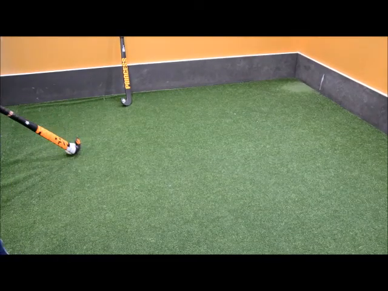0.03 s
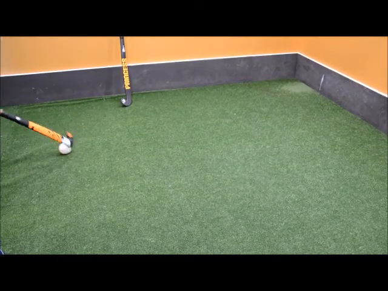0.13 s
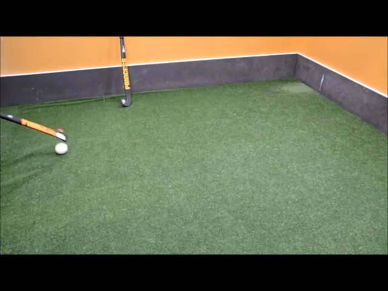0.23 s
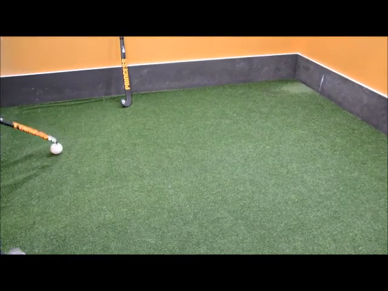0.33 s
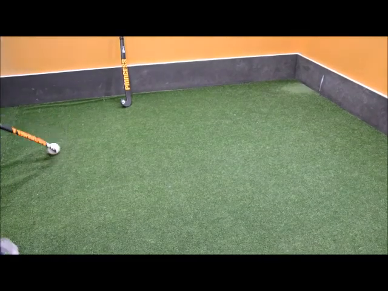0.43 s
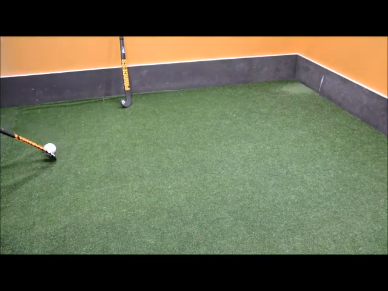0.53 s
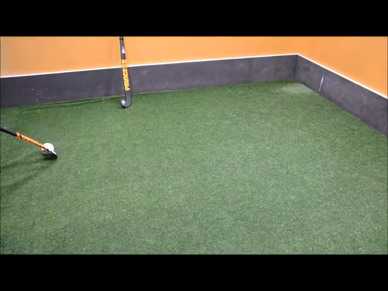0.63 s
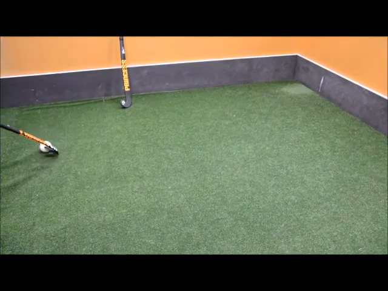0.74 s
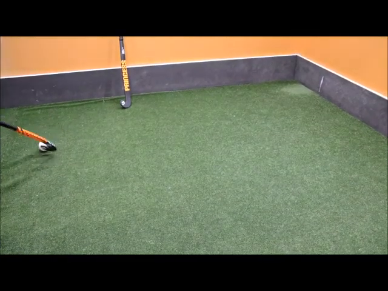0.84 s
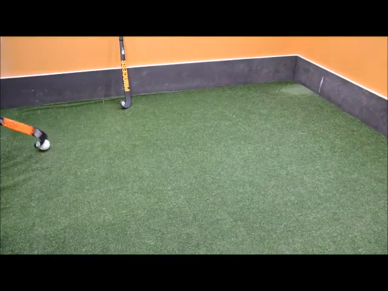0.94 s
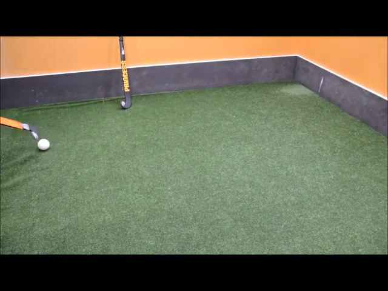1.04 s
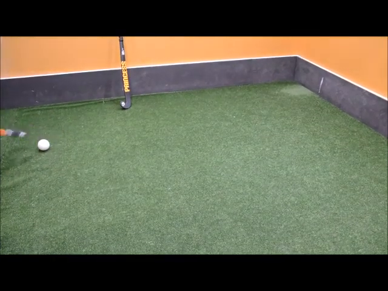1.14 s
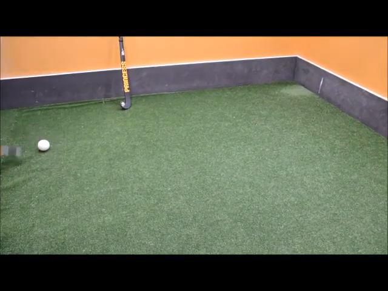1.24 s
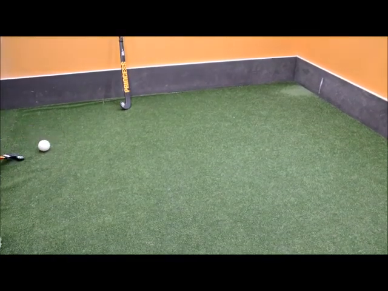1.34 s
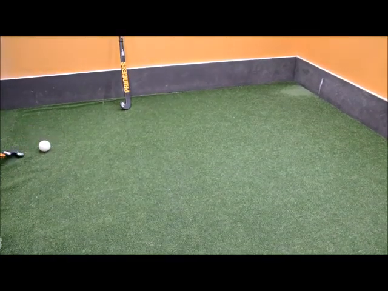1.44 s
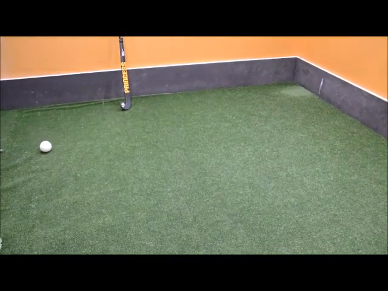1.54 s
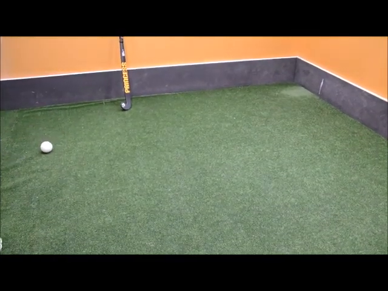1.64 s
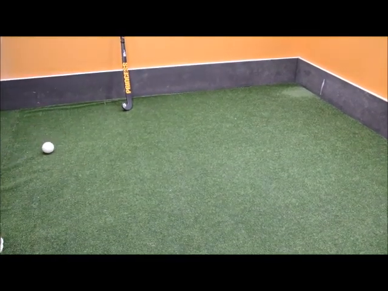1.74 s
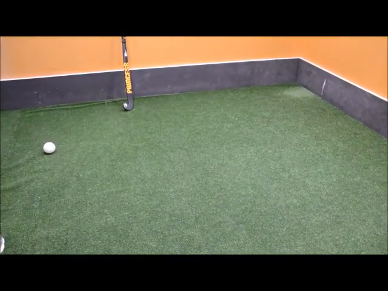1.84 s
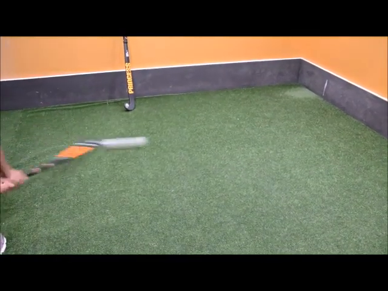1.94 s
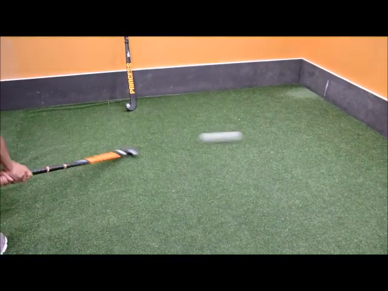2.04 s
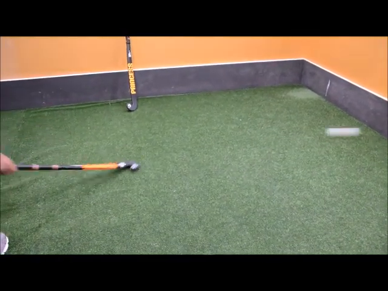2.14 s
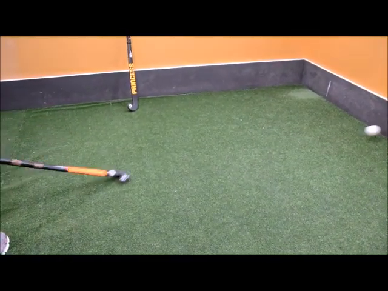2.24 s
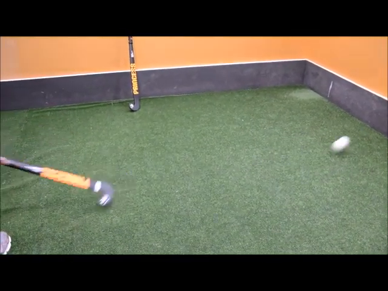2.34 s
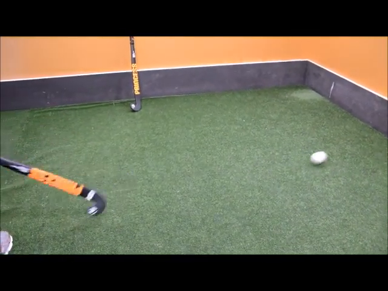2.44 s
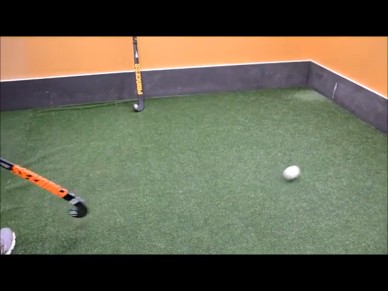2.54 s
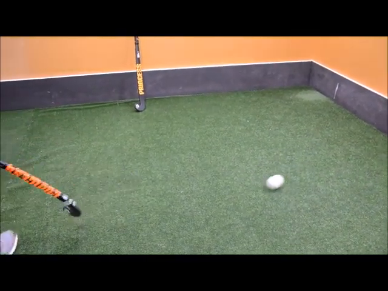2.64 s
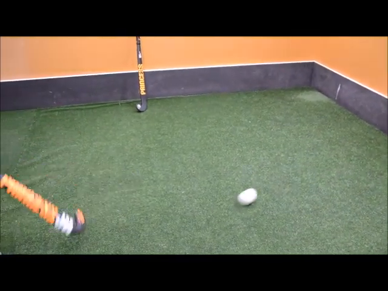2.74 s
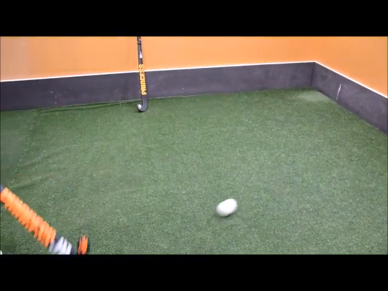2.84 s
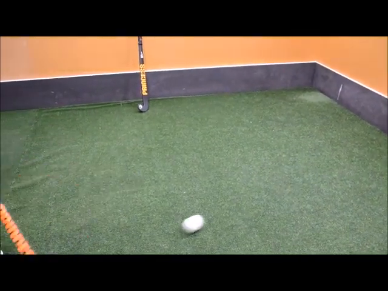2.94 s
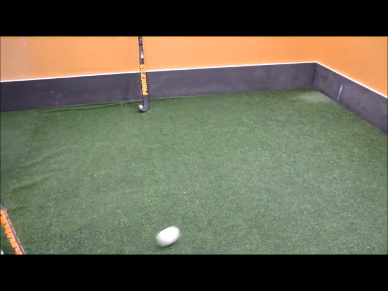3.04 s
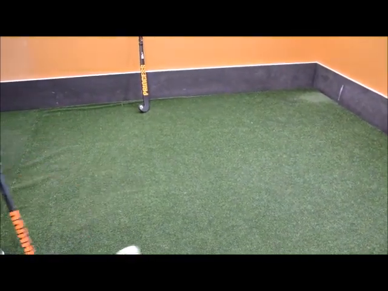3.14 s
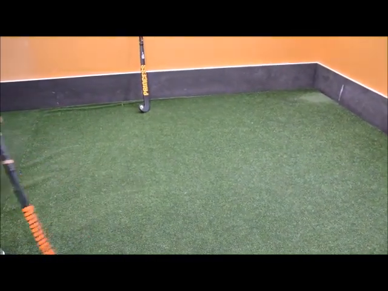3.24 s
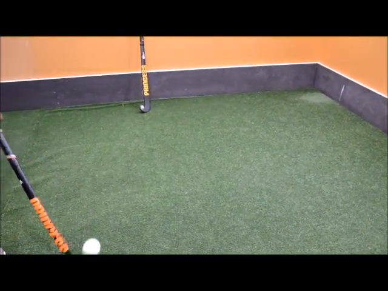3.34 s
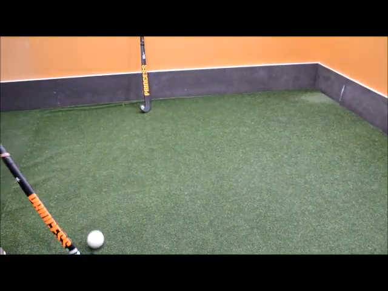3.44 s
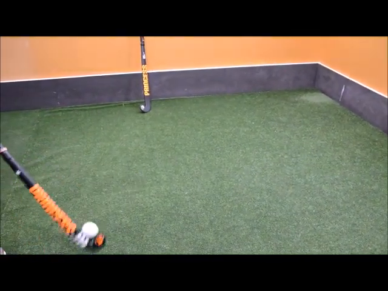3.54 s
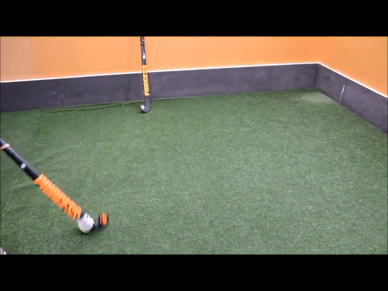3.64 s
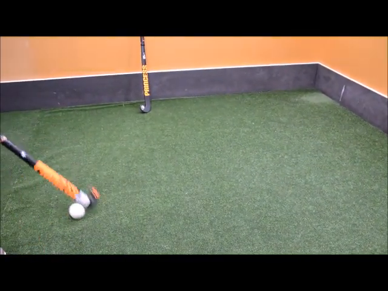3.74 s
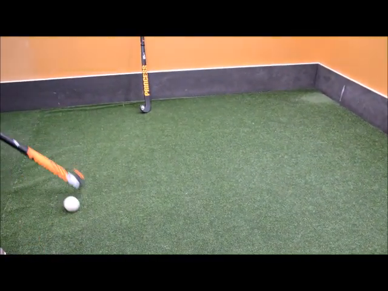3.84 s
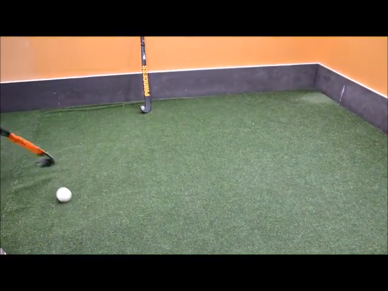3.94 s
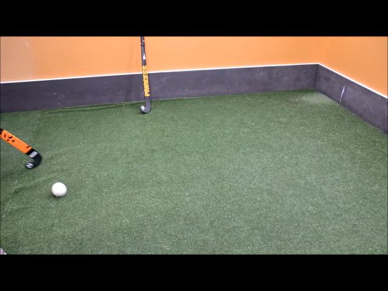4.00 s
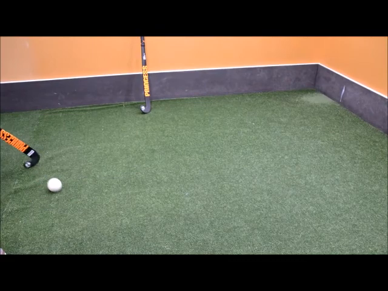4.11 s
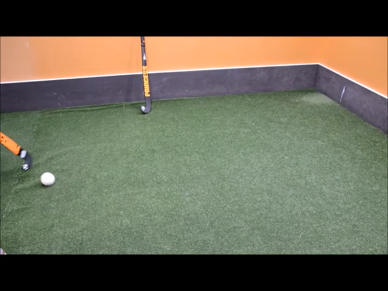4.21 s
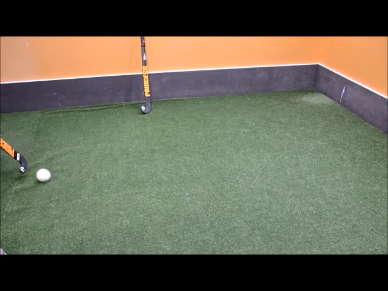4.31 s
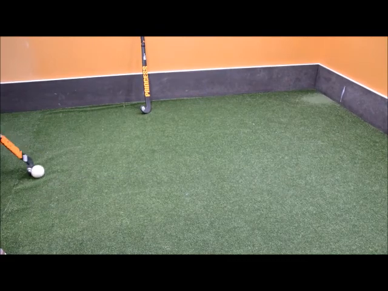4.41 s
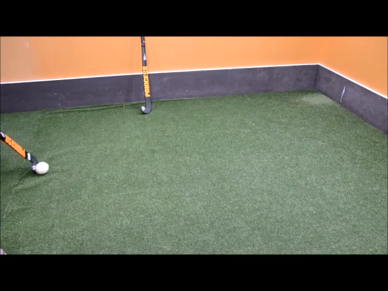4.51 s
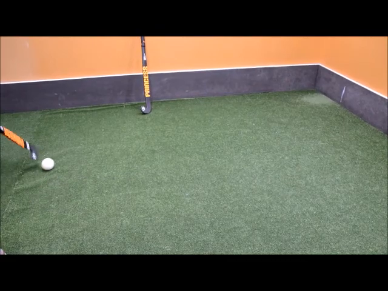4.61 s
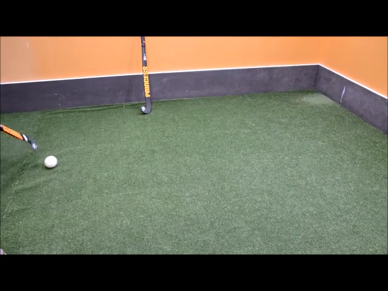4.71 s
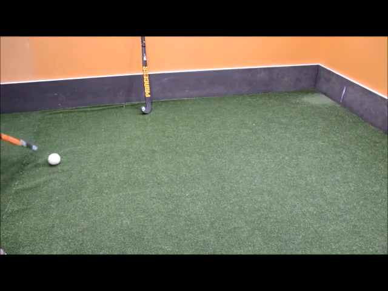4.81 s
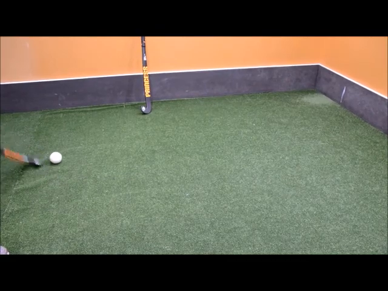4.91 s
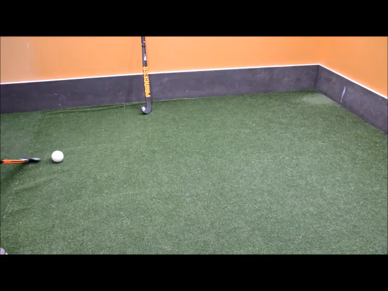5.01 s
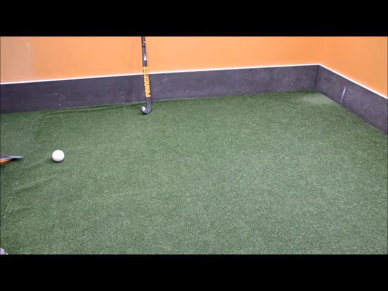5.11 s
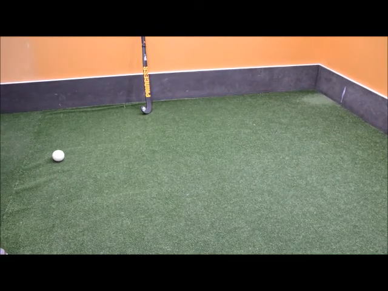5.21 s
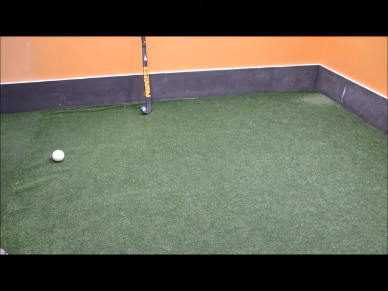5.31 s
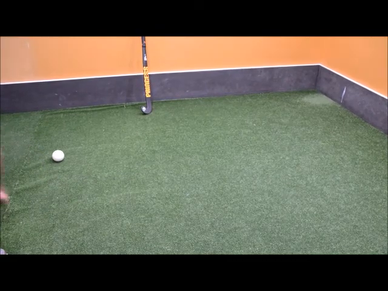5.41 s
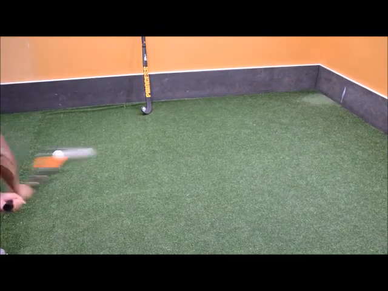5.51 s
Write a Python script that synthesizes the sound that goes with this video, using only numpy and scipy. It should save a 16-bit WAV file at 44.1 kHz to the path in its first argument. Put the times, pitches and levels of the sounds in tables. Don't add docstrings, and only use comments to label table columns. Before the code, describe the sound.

A small hard-walled room with quiet low air, heard in mono. From 0 s the stick barely nudges a hard ball, with a light tap near 0.6 and a low, soft dab at 1.2, amid dry hissing brushes over turf. At 1.9 a full shot cracks sharply, its tail filled by room reflections. At 2.2 the ball slams into the low side board: the loudest blow, boomy and clipped, with board tones ringing and a fuzzy low wall drone fading over the next second or so. Dull foot thumps follow at 2.5 and 2.7. At 3.25 the rebound is trapped with a hard woody knock and clear hollow shaft ring; a duller stop comes at 3.6. Small contacts follow: tap at 4.4, thin high clack at 4.7, dab at 4.9, then turf scuffing around 5.1. At 5.5 a last loud drive cracks and the sound ends on its brief tail.

```python
import sys
import numpy as np
from scipy import signal
from scipy.fft import irfft
from scipy.io import wavfile
from scipy.ndimage import uniform_filter1d

SR = 44100
rng = np.random.default_rng(int(sys.argv[2]) if len(sys.argv) > 2 else 0)


def boost_factor(decibels):
    exponent = np.asarray(decibels, float) / 20
    return 10 ** exponent


def int16_out(signal):
    q = np.round(np.clip(np.atleast_2d(signal).T, -1, 1) * 32767)
    wavfile.write(sys.argv[1], SR, q.astype(np.int16))


N = 245195


def evened(x):
    return x / np.sqrt(np.mean(x ** 2) + 1e-20)


def read(points, hz):
    f, value = np.transpose(points)
    return np.interp(np.log(hz + 1), np.log(f + 1), value)


def add(mix, start_s, sound):
    part = mix[round(start_s * SR):][:len(sound)]
    part += sound[:len(part)]


def blow(colour, spread_s, size=8192):
    hz = np.fft.fftfreq(size, 1 / SR)
    log_gain = np.log(boost_factor(np.maximum(read(colour, abs(hz)), -100)))
    minimum_phase = np.exp(np.conj(signal.hilbert(log_gain)))[:size // 2 + 1]
    stage_hz = np.cumsum(2 * rng.random(128)) / spread_s
    stage_hz = stage_hz[stage_hz < SR / 2, None]
    pole = np.exp(-np.pi * 0.45 / (spread_s * SR) + 2j * np.pi * stage_hz / SR)
    back = np.exp(-2j * np.pi * abs(hz[:len(minimum_phase)]) / SR)
    held = (back - pole.conj()) * (back - pole) / (1 - pole * back) / (1 - pole.conj() * back)
    return irfft(minimum_phase * held.prod(axis=0)) / abs(irfft(minimum_phase)).max()


def ring(modes, size=16384, rise_s=0.0003):
    t = np.arange(size) / SR
    sines = sum(boost_factor(db - 60 * t / t60_s) * np.sin(2 * np.pi * hz * t) for hz, db, t60_s in modes)
    radiation = signal.butter(3, 0.62 * modes[0][0], "high", fs=SR, output="sos")
    return signal.sosfilt(radiation, sines * (1 - np.exp(-t / rise_s)))


# pitch_hz, t60_s
ROOM_DECAY = [(60, 0.49), (150, 0.52), (400, 0.74), (1000, 0.8), (2500, 0.56), (6000, 0.62), (10000, 0.52),
              (16000, 0.57)]


def room(gap_s=0.0036, build_s=0.003, early_db=4, early_s=0.075):
    taps = np.zeros(SR)
    at = np.arange(0, SR - 12, 12) + rng.integers(0, 12, SR // 12 - 1)
    clumps_db = 0.5 * evened(uniform_filter1d(rng.standard_normal(at.shape), size=30))
    sizes_db = 3 * rng.standard_normal(at.shape) + clumps_db
    taps[at] = rng.choice([-1., 1.], at.shape) * boost_factor(sizes_db)
    hz, t, z = signal.stft(taps, SR, nperseg=512)
    fall_db = -60 * t / read(ROOM_DECAY, hz)[:, None] + early_db * np.exp(-(t / early_s) ** 2)
    tail = signal.istft(z * boost_factor(fall_db), SR, nperseg=512)[1][:SR]
    after_gap_s = np.maximum(np.arange(SR) / SR - gap_s, 0)
    tail = tail * (1 - np.exp(-after_gap_s / build_s))
    return tail / np.linalg.norm(tail)


def knocks(rows, colour, modes, ring_db, echo_ms, echo_db, spread_s,
           tick_hz=7000, lag_s=0., top_db=-4, dull_db=-3):
    out = np.zeros(N)
    tick_modes = [(tick_hz, 0, 0.0024), (1.45 * tick_hz, -5, 0.0015), (1.96 * tick_hz, top_db, 0.0015)]
    tick = np.roll(ring(tick_modes, rise_s=0.00003), round(lag_s * SR))
    for start_s, level_db, tick_db, room_db in rows:
        body = boost_factor(ring_db) * ring(modes)
        add(body, 0, blow(colour, spread_s))
        knock = boost_factor(level_db) * body
        crack = boost_factor(tick_db) * tick
        echo = knock + boost_factor(dull_db) * crack
        add(out, start_s, knock + crack)
        add(out, start_s + echo_ms / 1000, boost_factor(echo_db) * echo)
        add(out, start_s + 2 * echo_ms / 1000, -boost_factor(echo_db - 12) * echo)
        add(out, start_s, boost_factor(level_db + room_db) * signal.fftconvolve(body, room()))
    return out


# start_s, level_db, tick_db, room_db
SHOTS = [
    (1.8735, -0.5, -16, 4.5),
]
DRIVES = [
    (5.4853, 0.0079, -15, 5),
]
# pitch_hz, density_db_per_hz
SHOT_COLOUR = [(35, -70.5), (60, -35.5), (157, -29), (334, -15.5), (366, -16.5), (559, -2.5), (1060, -4),
               (1940, -12.5), (3750, -12), (5600, -28), (12400, -36), (15400, -38.5), (16500, -73)]
DRIVE_COLOUR = [(35, -74), (60, -35), (130, -28.5), (199, -26.5), (546, -10.5), (759, 0), (1370, -7),
                (1540, -6.5), (1940, -13.5), (3930, -9), (4220, -15), (15000, -41.5), (16500, -69)]
# pitch_hz, level_db, t60_s
FACE_MODES = [(591.3, -13.5, 0.013), (1012, -7, 0.021), (1550, 2, 0.014)]


def shot_and_drive():
    shot = knocks(SHOTS, SHOT_COLOUR, FACE_MODES, -20.5, echo_ms=4.5, echo_db=-17,
                  spread_s=0.0019, tick_hz=7300, lag_s=0.00095)
    drive = knocks(DRIVES, DRIVE_COLOUR, FACE_MODES, -14, echo_ms=4.7, echo_db=-10, dull_db=-4,
                   spread_s=0.0014, tick_hz=7380, lag_s=0.0009)
    return shot + drive


# start_s, level_db, tick_db, room_db
BOARD_HIT = [
    (2.1732, 8.74, 0, 7.96),
]
# pitch_hz, density_db_per_hz
BOARD_COLOUR = [(18, -65), (40, -43), (62, -38.5), (95, -9.5), (160, -8.5), (255, -5.5), (350, -2),
                (470, -8.5), (670, -8.5), (1000, -13), (2160, -22), (3500, -26.5), (8000, -42),
                (16500, -61)]
# pitch_hz, level_db, t60_s
PANEL_MODES = [(93, -7, .1), (204, -11.5, 0.079), (350, -8.5, .07), (683.6, 0, 0.089), (846, -20, .06)]


def board():
    return knocks(BOARD_HIT, BOARD_COLOUR, PANEL_MODES, -21.5, echo_ms=5.8, echo_db=0,
                  spread_s=0.0012, tick_hz=6464, top_db=-14, dull_db=-11)


# pitch_hz, level_db, t60_s
PLANK_MODES = [(99, -9.5, 0.36), (224, -12, .4), (278.9, -9.5, .4), (340, -4.5, .4), (375.3, -6.5, 0.369),
               (516, -15.5, 0.86), (611, -16, 0.54), (683, -9.5, .6), (740, -13.5, .7), (856, -16, .6)]


def plank():
    out = np.zeros(N)
    add(out, BOARD_HIT[0][0], ring(PLANK_MODES, size=32768, rise_s=0.016))
    return out


# start_s, level_db, tick_db, room_db
TRAPS = [
    (3.2470, -3.5, -25, 6.06),
]
STOPS = [
    (3.6225, -12, -24, 4.3),
]
# pitch_hz, density_db_per_hz
TRAP_COLOUR = [(35, -68), (60, -40), (366, -16), (520, -9), (629, -11.5), (759, -4), (1010, -11),
               (1130, -2.5), (1400, -8.5), (1730, -7), (1940, -16.5), (2770, -14.5), (5500, -31.5),
               (8150, -35), (15000, -46), (16500, -74)]
STOP_COLOUR = [(35, -56), (60, -24), (103, -18.5), (229, -12.5), (290, -5), (724, -5), (938, -5.5),
               (1270, -7.5), (1990, -15.5), (5220, -18.5), (11300, -42), (15400, -45), (16500, -77)]
# pitch_hz, level_db, t60_s
STICK_MODES = [(580, -17, 0.16), (755, -4, 0.034), (1088, -6, 0.066), (1271, -4, 0.059), (1680, -9, 0.023),
               (2830, -4, 0.027), (3330, -10, 0.031)]


def trap_and_stop():
    trap = knocks(TRAPS, TRAP_COLOUR, STICK_MODES, -13.5, echo_ms=10.05, echo_db=-2.5,
                  spread_s=0.001248, tick_hz=6440, top_db=11.5, dull_db=-23)
    stop = knocks(STOPS, STOP_COLOUR, STICK_MODES, -16.5, echo_ms=9.1, echo_db=-5.5,
                  spread_s=0.000723, tick_hz=6300, top_db=-22, dull_db=0)
    return trap + stop


# start_s, level_db, tick_db, room_db
DABS = [
    (1.2395, -14, -23, 6.6),
    (4.8965, -18.5, -28, 3.9),
]
# pitch_hz, density_db_per_hz
DAB_COLOUR = [(24, -46), (40, -26), (70, 3.5), (107, -8), (265, -3.5), (593, -11), (1090, 0.5),
              (1540, -11.5), (3730, -12.5), (11300, -40.5), (14900, -59), (16500, -74.5)]
# pitch_hz, level_db, t60_s
SOLE_MODES = [(205, 0.5, 0.046), (900, -11, 0.022), (1015, -7, .09), (1360, -16, 0.054)]


def dabs():
    return knocks(DABS, DAB_COLOUR, SOLE_MODES, -26, echo_ms=7.5, echo_db=-11.5,
                  spread_s=0.0034, tick_hz=3840, lag_s=0.0029)


# start_s, level_db, tick_db, room_db
CLACKS = [
    (4.7000, -19.5, -43, 8.3),
]
# pitch_hz, density_db_per_hz
CLACK_COLOUR = [(59, -58), (100, -23), (368, -21.5), (684, -30), (903, -8.5), (1070, -13), (1170, -6.5),
                (1830, -20.5), (1950, -19), (2310, -18), (3780, -12), (12000, -56), (16500, -69)]
# pitch_hz, level_db, t60_s
TOE_MODES = [(1210, 2, 0.051), (2030, -8, 0.14), (2170, -5.5, .06), (3430, -5.5, .08), (3760, -16, 0.058),
             (3900, -13, 0.07), (4280, -15, .045), (5240, -19, 0.05)]


def clack():
    return knocks(CLACKS, CLACK_COLOUR, TOE_MODES, -20, echo_ms=2.3, echo_db=-5,
                  spread_s=0.00151, tick_hz=3960)


# start_s, level_db, tick_db, room_db
TAPS = [
    (.5922, -28, -46, 6.5),
    (4.4060, -23.5, -40, 8.8),
]
NUDGES = [(0, -41, -70, 9.5), (.2130, -52, -58, 4.1), (.5125, -43, -40, 6.9), (2.6850, -46, -34, 2.2),
          (3.3680, -45, -49, 2.6), (3.4200, -48, -42, 2.6), (3.4350, -37, -43, 1.2),
          (3.6550, -42, -47, 1.2), (3.8450, -47, -52, 1.2), (5.0880, -59, -42, 6.9),
          (5.4530, -42, -48.5, 3.8)]
# pitch_hz, density_db_per_hz
TAP_COLOUR = [(59, -51), (100, -30), (190, -22), (230, -23), (310, -11), (466, -15.5), (1220, -3),
              (2360, -17.5), (4390, -18.5), (11000, -43), (16500, -41)]
NUDGE_COLOUR = [(59, -52), (100, -38), (216, 0), (262, -65), (401, 4.5), (963, 1), (1190, 1.5), (3700, -23),
                (15100, -26), (16500, -45)]
# pitch_hz, level_db, t60_s
HEAD_MODES = [(716, -13.5, 0.066), (1211, -7.5, 0.025)]


def taps_and_nudges():
    taps = knocks(TAPS, TAP_COLOUR, HEAD_MODES, -4.5, echo_ms=11, echo_db=-11, spread_s=0.001254)
    nudges = knocks(NUDGES, NUDGE_COLOUR, HEAD_MODES, -24.5, echo_ms=27, echo_db=3,
                    spread_s=0.00068, tick_hz=3980)
    return taps + nudges


# pitch_hz, level_db, t60_s
SHAFT_MODES = [(748, -3.5, 0.95), (1150, -24, 0.38), (1220, -11.5, 0.55), (1244, 1, 0.25), (1370, -5, 0.26),
               (1698, 4, 0.48)]
# start_s, level_db, loss_db per third octave away from 1200 Hz
SINGS = [
    (0.592, -54, -1),
    (1.242, -47, 0),
    (3.247, -19.5, 4.5),
    (3.6227, -28.5, 8.5),
    (4.408, -39, -15),
    (4.701, -50, -2),
]


def shaft():
    out = np.zeros(N)
    for start_s, level_db, loss_db in SINGS:
        modes = []
        for hz, mode_db, t60_s in SHAFT_MODES:
            away_db = abs(loss_db * np.log2(hz / 1200)) * 3
            modes.append((hz, mode_db + level_db - away_db, t60_s))
        add(out, start_s, ring(modes, size=32768, rise_s=0.0013))
    return out


# start_s, peak_db, pitch_hz, t60_s
THUMPS = [(0.66, -75, 206, 0.27), (1.236, -36, 185, 0.13), (1.246, -55, 265, 0.13), (1.25, -46, 139, 0.2),
          (2.5, -37, 85.5, 0.23), (2.719, -47, 76, 0.29), (3.418, -35, 99, 0.084), (3.557, -47, 80.7, 0.13),
          (3.613, -43.5, 192, 0.28), (4.097, -52, 114.8, 0.23), (4.658, -50, 96.9, 0.25),
          (4.662, -48, 227, 0.12), (4.891, -43, 191.4, 0.19), (5.38, -56, 92.5, 0.42)]


def thumps():
    out, t = np.zeros(N), np.arange(SR // 2) / SR
    for start_s, peak_db, hz, t60_s in THUMPS:
        push = boost_factor(peak_db - 60 * t / t60_s) * np.sin(2 * np.pi * hz * t) * (1 - np.exp(-t / 0.0029))
        add(out, start_s, push + boost_factor(-10) * signal.fftconvolve(push, room())[:len(t)])
    return out


def drone(hz, width_hz):
    r = np.exp(-np.pi * width_hz / SR)
    noise = rng.standard_normal(N) + 1j * rng.standard_normal(N)
    slow = signal.lfilter([1], [1, -2 * r, r * r], noise)
    return evened((slow * np.exp(2j * np.pi * hz * np.arange(N) / SR)).real)


# pitch_hz, width_hz, level_db, t60_s
WALL_DRONES = [(82, 14, -37, 1.8), (226, 51, -48.5, 2.7), (545, 35, -44, 1.8)]


def wall():
    t = np.arange(N) / SR - BOARD_HIT[0][0]
    out = sum(drone(hz, width_hz) * boost_factor(db - 60 * t / t60_s) for hz, width_hz, db, t60_s in WALL_DRONES)
    return out * np.clip(t / 0.05, 0, 1)


def hiss(colour, level_db, tilt_db, patchy_db, flicker_db):
    hop = 128
    frames, hz = N // hop + 5, np.fft.rfftfreq(512, 1 / SR)
    a, b, patches = rng.standard_normal((frames, 257, 3)).T
    flicker = rng.standard_normal(frames)
    patches = uniform_filter1d(uniform_filter1d(patches, size=5, axis=0), size=16, axis=1)
    frame_tilt_db = tilt_db[np.minimum(np.arange(frames) * hop, N - 1)]
    field_db = patchy_db * evened(patches) + flicker_db * flicker
    field_db = field_db + np.log2(hz[:, None] / 2000 + 0.03) * frame_tilt_db
    z = (a + 1j * b) * boost_factor(read(colour, hz))[:, None] * boost_factor(field_db)
    return boost_factor(level_db) * evened(signal.istft(z, nperseg=512, noverlap=512 - hop)[1][:N])


# pitch_hz, density_db_per_hz
TURF_COLOUR = [(59, -36.5), (100, -13.5), (317, -16), (353, -11.5), (384, -12), (518, -22), (922, -2),
               (2460, -3), (3780, 1), (4880, -8.5), (12200, -24), (15500, -35), (16500, -47)]
# start_s, length_s, level_db, tilt_db_per_octave
STROKES = [(0, .04, -53.5, -1.5), (0.182, 0.026, -56, -1.5), (0.515, .05, -51.5, 0),
           (0.589, 0.083, -48, -2.5), (0.863, 0.047, -57, -3), (1.074, 0.14, -60, -1.7),
           (1.273, 0.11, -51, -4.5), (1.298, 0.25, -54, 3), (1.527, 0.2, -49, -1.2),
           (1.825, .035, -42.5, -2), (1.93, 0.096, -55, 6), (2.137, 0.032, -50, 0.5),
           (2.509, 0.11, -60, 3.5), (2.685, .025, -46.5, 1), (3.122, .07, -67, 4), (3.296, .52, -60, -0.5),
           (4.383, 0.095, -71, 7.5), (4.648, 0.035, -59.5, 2), (4.793, 0.35, -50.5, -0.4),
           (5.092, .18, -46.5, -0.1), (5.375, .07, -58.5, 3.5), (5.461, .03, -43, -1),
           (5.53, .04, -58, -4.5)]
RISE_DB_PER_S, FALL_DB_PER_S, REST_DB, REST_TILT_DB = 298, 167.5, -68.5, 3


def turf():
    t = np.arange(N) / SR
    power = boost_factor(2 * REST_DB) * np.ones(N)
    bright = REST_TILT_DB * power
    for start_s, length_s, level_db, tilt_db in STROKES:
        rise_loss_db = RISE_DB_PER_S * np.maximum(start_s - t, 0)
        fall_loss_db = FALL_DB_PER_S * np.maximum(t - start_s - length_s, 0)
        stroke = boost_factor(2 * (level_db - rise_loss_db - fall_loss_db))
        power = power + stroke
        bright = bright + tilt_db * stroke
    fibres = hiss(TURF_COLOUR, 10 * np.log10(power), bright / power, patchy_db=-1.5, flicker_db=3.3)
    return fibres + boost_factor(-4) * signal.fftconvolve(fibres, room())[:N]


# pitch_hz, density_db_per_hz
AIR_COLOUR = [(12, -50), (20, -19), (75, -2), (165, -4.5), (342, -2.5), (416, -13), (551, -1.5),
              (616, -5.5), (1240, -2), (1390, -6), (1690, -10), (3830, -16.5), (6350, -27), (15200, -37.5),
              (16500, -55.5)]


def air():
    breath = hiss(AIR_COLOUR, -58.5, np.zeros(N), patchy_db=3.8, flicker_db=1.66)
    return breath + boost_factor(-74) * drone(hz=76.5, width_hz=25)


def scene():
    hits = shot_and_drive() + board() + trap_and_stop() + dabs() + clack() + taps_and_nudges()
    ringing = plank() + shaft() + wall()
    return (hits + ringing + thumps() + turf() + air())[None]


def top_cut(x):
    return signal.sosfilt(signal.butter(12, 16780, fs=SR, output="sos"), x)


def record(dry):
    knee = 12
    thin = signal.sosfilt(signal.butter(3, 48, "high", fs=SR, output="sos"), dry)
    thin = signal.sosfilt(signal.butter(6, 15600, fs=SR, output="sos"), thin)
    full = thin / (1 + abs(thin) ** knee) ** (1 / knee)
    full = signal.oaconvolve(full, signal.firwin(255, 16500, fs=SR)[None], "same")
    return top_cut(full)


dry = scene()
out = record(dry)
int16_out(out)
```